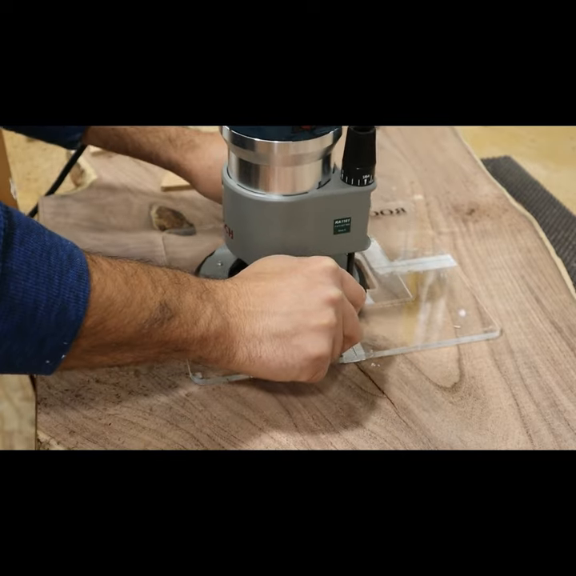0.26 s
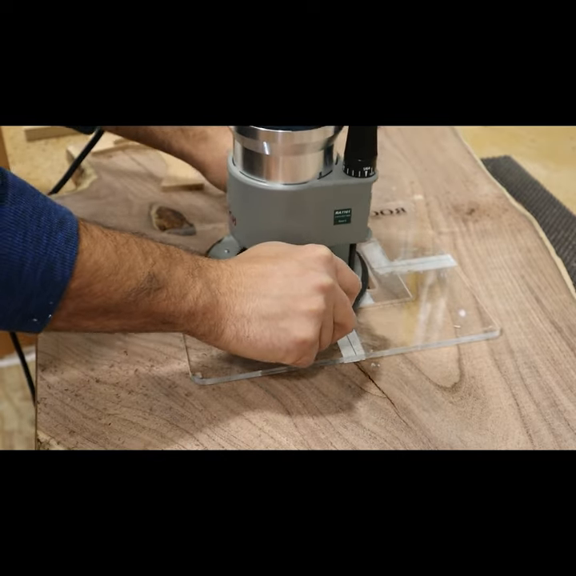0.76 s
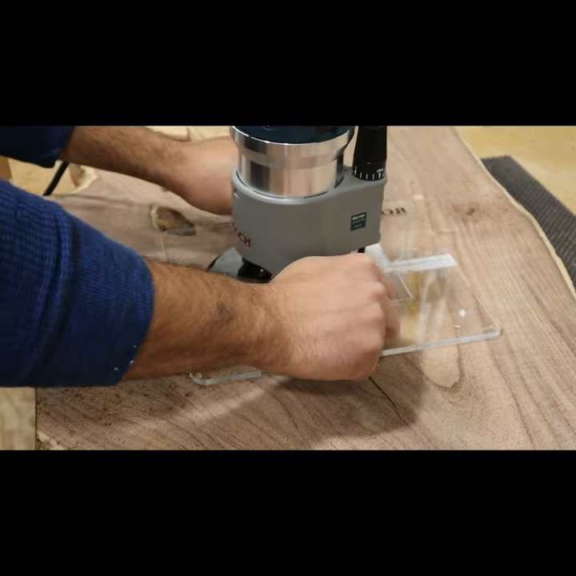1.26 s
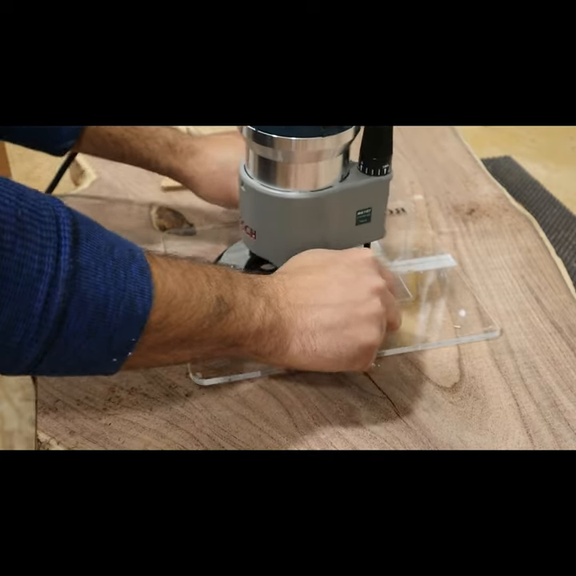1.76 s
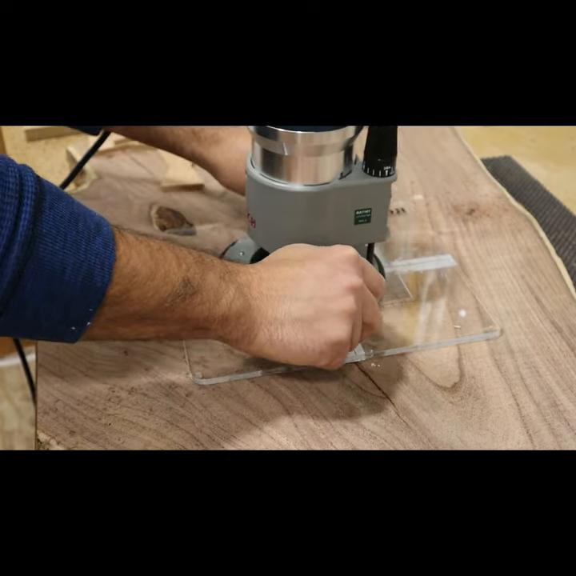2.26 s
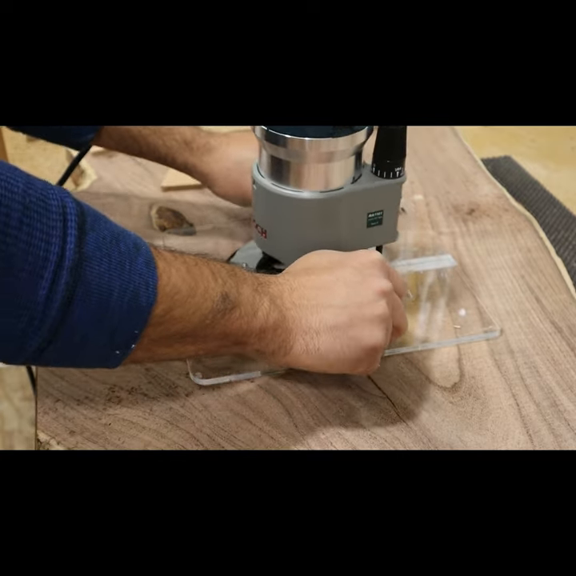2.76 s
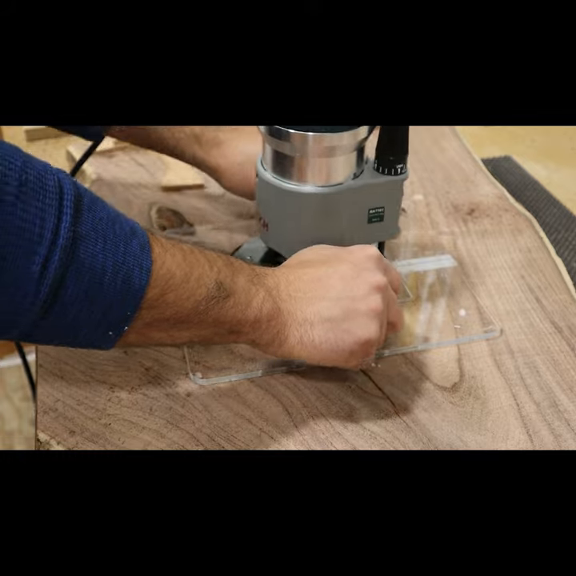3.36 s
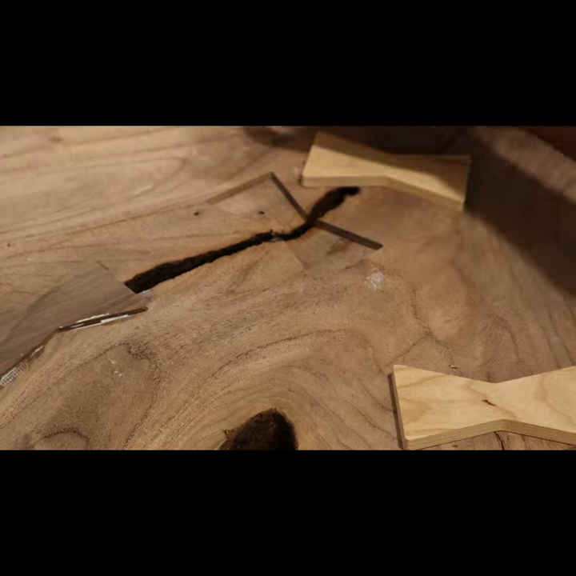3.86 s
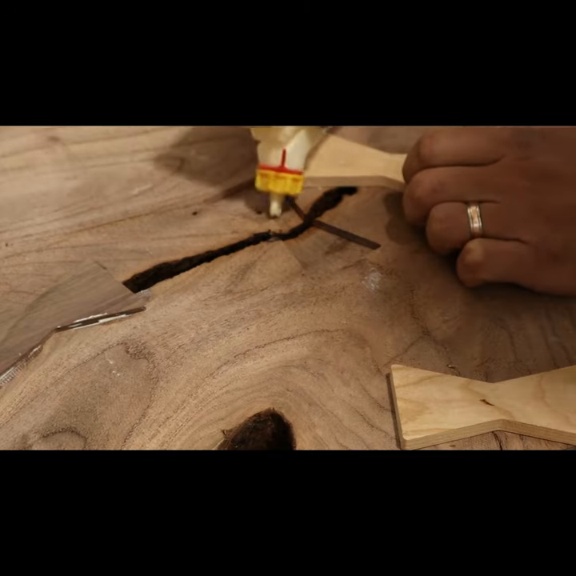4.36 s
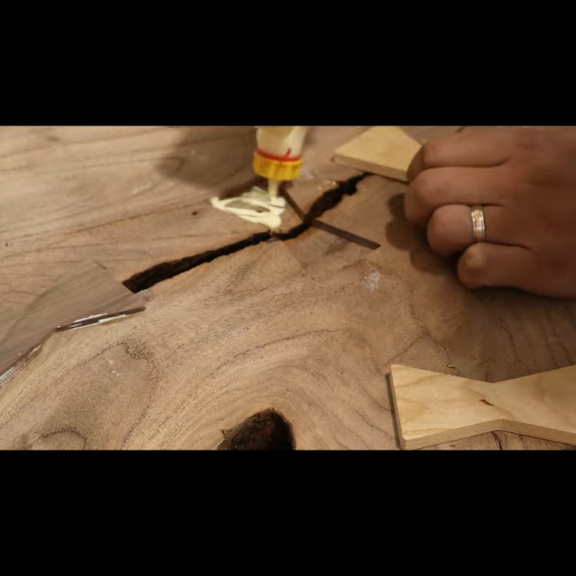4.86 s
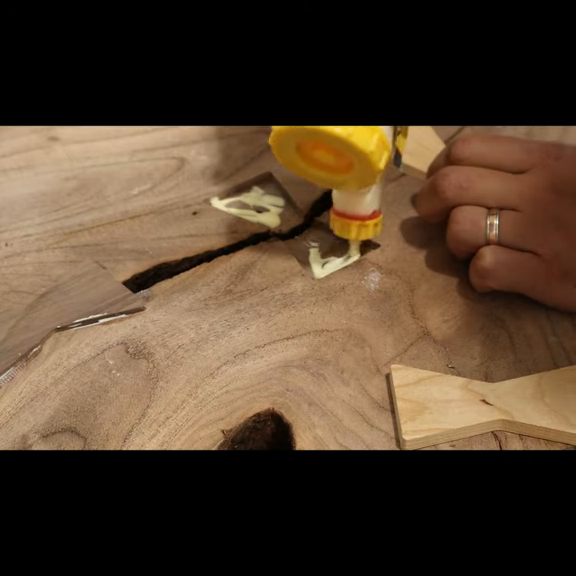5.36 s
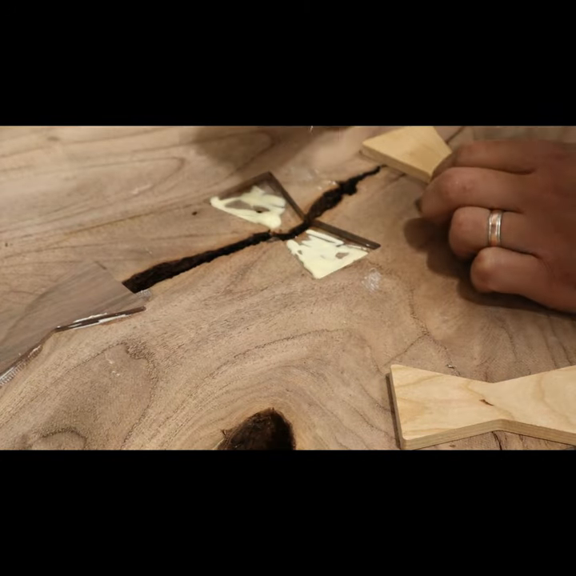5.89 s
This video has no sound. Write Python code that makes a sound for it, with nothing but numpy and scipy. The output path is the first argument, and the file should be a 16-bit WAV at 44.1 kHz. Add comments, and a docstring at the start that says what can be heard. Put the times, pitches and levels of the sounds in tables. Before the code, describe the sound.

Close up in a small workshop, an electric router cuts a wooden slab: a piercing, rough high squeal over fan rush, motor whine and gritty chip spray, with brief gaps between four passes. It ends abruptly before four seconds. In the quiet room, a cluster of dull wooden knocks follows at once, then soft brushing, sparse faint taps, two tiny bottle clicks and a last double knock.

```python
"""Router on a wooden slab

A handheld router makes four cutting passes: band-shaped noise is the fan's rush, noise bursts are flying
chips, and a modulated tone is the shrill squeal of the two-flute bit.
The router ends abruptly. Then, in the quiet workshop, thuds, taps and swells of hiss are wooden pieces set
down and slid on the slab, and short ringing tones are a glue bottle's clicks.
"""
import sys
import numpy as np
from scipy import signal
from scipy.fft import rfft, irfft, next_fast_len
from scipy.io import wavfile
from scipy.ndimage import uniform_filter1d, map_coordinates

SR = 44100
rng = np.random.default_rng(int(sys.argv[2]) if len(sys.argv) > 2 else 0)


def wrap_up_sound(samples):
    """Save the sound to the file named by the first command line argument, as 16-bit audio."""
    columns = np.atleast_2d(samples).T
    # keep every value between -1 and 1, then stretch to whole-number steps
    tamed = np.clip(columns, -1, 1)
    steps = np.round(tamed * 32767).astype(np.int16)
    wavfile.write(sys.argv[1], SR, steps)


N = 270333
TIME = np.arange(N) / SR
FRAME_HZ = 300  # slow changes of the tone lines are worked out this many times a second
FRAMES = np.arange(N * FRAME_HZ // SR + 2) / FRAME_HZ

# All levels in the tables are relative; the functions add the final balance.
# Motor speed, which sags under load. Each row: time in seconds, turns a second.
MOTOR_SPEED = [(0.03, 245.6), (0.22, 246.9), (0.41, 242.0), (0.53, 246.5), (0.66, 243.1), (0.98, 244.4),
               (1.34, 242.0), (1.55, 248.6), (1.74, 245.2), (1.97, 242.6), (2.06, 240.0), (2.29, 244.3),
               (2.5, 241.6), (2.66, 245.4), (2.86, 245.3), (3.12, 240.6), (3.2, 244.5), (3.58, 243.6),
               (3.69, 246.5)]
# The bit is in the wood. Each row: start in seconds, end in seconds.
CUTS = [(0.005, 1.394), (1.598, 2.598), (2.657, 3.155), (3.195, 3.608)]
ENTRY_S, EXIT_S, SETTLE_S = 0.034, 0.026, 0.14  # easing in, easing out, steadying of the cut
ROUTER_END_S = 3.698

# Pitch of the chatter note, which sags with the load and starts flat. Each row: time in seconds, Hz.
NOTE_PITCH = [(0.022, 5703.0), (0.052, 5641.0), (0.075, 5689.0), (0.205, 5715.0), (0.342, 5683.0),
              (0.402, 5619.0), (0.499, 5720.0), (0.756, 5663.0), (0.853, 5699.0), (1.252, 5676.0),
              (1.265, 5658.0), (1.634, 5680.0), (1.659, 5661.0), (1.706, 5701.0), (2.05, 5645.0),
              (2.12, 5681.0), (2.19, 5643.0), (2.265, 5690.0), (2.415, 5678.0), (2.454, 5639.0),
              (2.622, 5688.0), (2.664, 5640.0), (2.784, 5649.0), (2.796, 5699.0), (2.976, 5686.0),
              (3.023, 5650.0), (3.265, 5626.0), (3.36, 5692.0), (3.539, 5666.0), (3.599, 5698.0)]
# Strength of the chatter note, one curve a pass. Each row: time in seconds, level in dB.
NOTE_LEVEL = [
    [(0.007, -33.5), (0.052, -17.0), (0.107, -21.5), (0.122, -16.5), (0.254, -18.5), (0.359, -22.0),
     (0.369, -19.0), (0.414, -30.5), (0.509, -15.0), (0.599, -24.0), (0.631, -21.5), (0.683, -27.5),
     (0.731, -22.0), (0.746, -26.0), (0.791, -18.0), (0.863, -22.0), (0.963, -20.0), (0.985, -25.0),
     (1.08, -19.0), (1.225, -15.0), (1.247, -19.0), (1.384, -22.0)],
    [(1.606, -17.5), (1.626, -16.0), (1.674, -18.5), (1.694, -26.5), (1.719, -22.5), (1.776, -23.0),
     (1.806, -17.5), (1.871, -24.0), (1.911, -18.5), (1.966, -24.5), (2.018, -19.5), (2.05, -24.0),
     (2.063, -29.5), (2.118, -24.5), (2.198, -20.0), (2.217, -26.5), (2.275, -15.5), (2.31, -24.5),
     (2.36, -17.0), (2.499, -25.0), (2.512, -18.0), (2.529, -24.5), (2.572, -18.5), (2.589, -23.0)],
    [(2.666, -24.0), (2.679, -21.0), (2.761, -20.5), (2.791, -27.5), (2.804, -20.5), (2.886, -19.5),
     (2.913, -25.0), (2.936, -21.0), (3.011, -25.0), (3.13, -19.5), (3.148, -25.5)],
    [(3.2, -28.0), (3.213, -25.5), (3.223, -30.0), (3.26, -22.0), (3.32, -26.0), (3.337, -20.0),
     (3.355, -27.5), (3.37, -23.5), (3.432, -25.5), (3.445, -22.0), (3.529, -18.5), (3.599, -22.0)],
]
# Strong sideband two shaft turns below the note, one curve a pass. Each row: time in seconds, level in dB.
TWO_TURNS_BELOW = [
    [(0.007, -36.5), (0.04, -25.0), (0.082, -34.0), (0.437, -31.5), (0.554, -38.0), (0.589, -31.5),
     (0.748, -24.0), (0.766, -31.0), (1.028, -30.5), (1.043, -27.0), (1.285, -31.5), (1.324, -29.0),
     (1.384, -33.5)],
    [(1.606, -26.0), (1.671, -30.5), (1.686, -22.5), (1.828, -29.0), (1.983, -28.5), (2.018, -25.0),
     (2.06, -29.5), (2.212, -27.0), (2.227, -34.5), (2.315, -35.5), (2.365, -25.5), (2.392, -31.0),
     (2.494, -31.0), (2.589, -34.5)],
    [(2.666, -29.0), (2.739, -27.5), (2.829, -36.0), (2.946, -34.5), (2.963, -38.5), (2.996, -31.5),
     (3.098, -29.0), (3.148, -30.0)],
    [(3.2, -30.5), (3.22, -21.5), (3.258, -27.0), (3.28, -38.5), (3.3, -30.5), (3.345, -36.0),
     (3.512, -32.5), (3.599, -38.5)],
]
# Strong sideband four shaft turns below the note, one curve a pass. Each row: time in seconds, level in dB.
FOUR_TURNS_BELOW = [
    [(0.007, -34.5), (0.03, -28.0), (0.205, -36.5), (0.292, -32.0), (0.309, -37.5), (0.364, -27.0),
     (0.561, -37.5), (0.614, -27.0), (0.681, -38.0), (0.751, -25.5), (0.776, -33.5), (0.868, -29.0),
     (0.933, -33.0), (0.968, -25.5), (0.988, -29.5), (1.31, -31.5), (1.369, -27.0), (1.384, -32.5)],
    [(1.606, -26.5), (1.666, -35.5), (1.729, -25.5), (1.763, -31.5), (1.946, -25.0), (1.976, -27.5),
     (2.01, -18.0), (2.055, -30.0), (2.113, -26.5), (2.145, -38.0), (2.202, -30.0), (2.22, -34.0),
     (2.362, -25.5), (2.484, -32.0), (2.499, -25.0), (2.589, -36.0)],
    [(2.666, -31.5), (2.724, -25.0), (2.786, -35.0), (2.799, -29.0), (3.051, -27.0), (3.085, -31.5),
     (3.11, -26.0), (3.148, -29.0)],
    [(3.2, -32.0), (3.22, -27.5), (3.268, -34.0), (3.4, -27.5), (3.552, -27.5), (3.587, -23.5),
     (3.599, -28.0)],
]
# Other parts of the squeal, one curve a pass.
# Each row: time in seconds, octave level in dB, level in dB of the sideband two turns above the note.
OVERTONES = [
    [(0.007, -42.5, -36.0), (0.1, -33.5, -26.5), (0.342, -33.5, -29.5), (0.402, -41.0, -37.5),
     (0.504, -32.5, -33.5), (0.751, -36.5, -32.0), (0.783, -34.0, -28.0), (1.038, -29.0, -33.0),
     (1.063, -29.0, -37.0), (1.09, -30.5, -31.0), (1.384, -36.0, -32.0)],
    [(1.606, -37.0, -36.0), (1.666, -37.0, -28.5), (1.746, -32.5, -27.0), (1.976, -34.5, -29.0),
     (2.013, -32.5, -28.5), (2.115, -33.0, -33.0), (2.175, -40.0, -39.0), (2.292, -33.0, -31.5),
     (2.574, -37.0, -33.0), (2.589, -42.5, -37.5)],
    [(2.666, -40.5, -40.0), (2.689, -38.0, -40.5), (2.746, -34.5, -29.5), (2.886, -34.5, -24.0),
     (3.113, -32.5, -30.0), (3.13, -32.0, -34.0), (3.148, -38.5, -36.0)],
    [(3.2, -43.0, -45.5), (3.268, -37.5, -32.5), (3.29, -36.0, -36.0), (3.375, -31.0, -27.0),
     (3.44, -28.5, -23.5), (3.577, -31.0, -28.0), (3.599, -35.5, -34.5)],
]
# Sidebands fade away from the note. Each row: offset in shaft turns, level in dB.
SIDEBAND_SKIRT = [(-16, -23), (-8, -21), (-6, -15), (-4, 0), (2, 0), (4, -8), (6, -22), (16, -21)]
# Lines around the octave of the note. Each row: offset in shaft turns, dB against the octave level.
OCTAVE_LINES = [(-5, -42), (-5, -12.5), (0, 2), (5, -6.5), (0, -6), (1.5, -18), (7, -28)]
# The note swings between the ears as the router moves through its own reflections.
# Each row: time in seconds, left minus right in dB.
NOTE_SWAY = [(0.022, -2.5), (0.04, -6.0), (0.307, 3.5), (0.357, -3.0), (0.856, 0.0), (0.995, 7.5),
             (1.043, -6.0), (1.24, 1.0), (1.277, -5.5), (1.619, 0.0), (1.659, 5.0), (1.721, -1.5),
             (1.783, 6.0), (1.98, -4.5), (2.045, 10.5), (2.135, -2.0), (2.352, 5.0), (2.474, -6.0),
             (2.572, 0.0), (2.779, -11.0), (2.794, -1.0), (2.966, 6.5), (3.006, -8.0), (3.048, -0.5),
             (3.108, -3.5), (3.128, 1.5), (3.312, -1.0), (3.33, 6.0), (3.46, -8.0), (3.485, 3.0),
             (3.517, -6.0), (3.599, -1.0)]
NOTE_WANDER_HZ = 3
NOTE_SWING_DB, SIDEBAND_SWING_DB = .75, 2.2
ENTRY_LOOSE = .8  # extra looseness of the note as the bit enters
ENTRY_ODD_DB = 5  # boost of the weak lines one and three turns below the note as the bit enters

# Lines from the flutes striking the wood. Each row: multiple of the shaft speed, level in dB.
BITE_LINES = [(8, -53), (12, -52), (16, -45), (20, -42), (23, -45), (26, -48), (30, -55), (40, -54),
              (48, -58), (52, -62)]
# Colour of the chip spray. Each row: Hz, dB per Hz.
CHIP_COLOUR = [(300, -30), (1500, -13), (3000, -9), (4300, -2), (4900, 3), (5800, 3), (6900, -4),
               (9500, -4.5), (11000, -10), (12600, -12), (13300, -27), (15000, -45)]
# The bit's bending resonance under a rough bite. Each row: Hz, dB per Hz.
RASP_COLOUR = [(1500, -75), (3500, -61), (4500, 1), (5100, -6), (5750, 3), (6300, -17), (7500, -17),
               (12000, -74)]
# The bit grazes the wood or grabs at hard grain.
# Each row: peak time in seconds, half length in seconds, rasp level in dB.
GRABS = [(.05, .02, -38), (.38, .025, -35), (.62, .03, -37), (.745, .028, -34), (1.404, .012, -41),
         (1.575, .02, -39), (1.615, .02, -36), (1.7, .026, -34), (2.715, .045, -33), (3.222, .014, -28),
         (3.255, .02, -34), (3.59, .022, -39)]
SCRAPE_DB = -35.5  # the rasp that goes on all through a cut

# Level of the fan's rush. Each row: time in seconds, level in dB.
FAN_LEVEL = [(0.0, -26.0), (0.087, -32.0), (0.853, -32.5), (0.893, -31.0), (1.327, -34.0), (1.584, -29.5),
             (1.631, -32.0), (2.105, -35.0), (2.35, -33.0), (2.39, -35.5), (2.627, -35.0), (2.686, -32.5),
             (3.12, -34.5), (3.445, -32.0), (3.627, -36.0), (3.679, -33.0)]
# Colour of the fan's rush. Each row: Hz, dB per Hz.
FAN_COLOUR = [(35, -77), (60, -36.5), (312, -16.5), (464, -8.5), (642, -6.5), (1050, 7), (1350, 1.5),
              (1790, -11), (2010, -5.5), (3190, -10), (3420, -7), (4740, -8), (6120, -10), (13200, -20.5),
              (15500, -65.5)]
# Hum of the two flutes. Each row: time in seconds, level in dB.
FLUTE_HUM = [(0.0, -37.5), (0.18, -46.0), (0.461, -37.0), (0.509, -45.5), (0.818, -33.0), (1.053, -36.5),
             (1.367, -39.0), (1.404, -48.0), (1.734, -43.0), (1.811, -48.5), (1.993, -39.0), (2.083, -48.5),
             (2.165, -46.0), (2.222, -35.0), (2.517, -37.0), (2.627, -50.0), (2.671, -41.5), (2.731, -48.0),
             (3.071, -39.5), (3.18, -49.5), (3.218, -37.0), (3.452, -35.0), (3.579, -39.0), (3.637, -57.0),
             (3.679, -45.5)]
# The hum shifts between the ears as the router moves through standing waves.
# Each row: time in seconds, radians by which the left leads.
HUM_LEAD = [(.15, 1.8), (.45, 0), (1, 1.1), (1.1, -1.3), (1.35, -2.3), (1.7, -.5), (1.9, -2.6),
            (2.28, -1.4), (2.6, 2), (2.75, -1.4), (2.9, .8), (3, 2.5), (3.35, 2.7), (3.45, 1.6)]
# The motor's own lines. Each row: multiple of the shaft speed, level in dB.
WHINE_LINES = [(3, -62), (4, -52), (8, -54), (10, -61), (12, -55), (14, -53), (16, -55), (18, -58),
               (21, -64), (24, -56), (26, -60), (36, -62), (52, -69)]
FREE_WHINE_DB = 4.5  # the motor whines more when the bit runs free
# One line of the motor sings out briefly.
# Each row: peak time in seconds, half length in seconds, level in dB.
SINGS = [(1.32, .035, -38), (1.525, .055, -36.5)]
SING_ORDER = 14  # multiple of the shaft speed
# The motor's low hum. Each row: time in seconds, shaft imbalance level in dB, mains level in dB.
LOW_HUM = [(0.0, -65.5, -69), (0.32, -62, -66), (0.37, -77, -75), (1.1, -77, -71), (1.16, -60, -97),
           (1.85, -82, -62.5), (2.41, -59, -75.5), (2.98, -77.5, -69.5), (3.4, -55.5, -74),
           (3.66, -61, -74)]
PATCHY_DB = 1.9  # depth in dB of a random level change across the noise

# Wood set down on the slab. Each row: time in seconds, thud level in dB, thud pitch in Hz,
# tap level in dB, tap's low edge in Hz, tap's high edge in Hz, seconds for the tap to fade by 60 dB.
KNOCKS = [(3.713, -42, 83.6, -40.5, 765, 2400, 0.24), (3.797, -41, 81, -36.5, 370, 1120, 0.048),
          (3.815, -31.5, 83, -36, 330, 1000, 0.057), (3.825, -31.5, 80, -20, 674, 1560, 0.033),
          (3.841, -33, 135, -35, 250, 880, 0.073), (4.202, -61, 100.6, -47.5, 500, 1200, 0.057),
          (4.645, -48, 89, -65, 230, 695, 0.039), (4.816, -55, 100, -42.5, 810, 2540, 0.14),
          (5.02, -45, 90, -42.5, 646, 1600, 0.13), (5.035, -35, 90, -45, 1050, 1420, 0.095),
          (5.171, -49, 90, -40, 693, 1690, 0.042), (5.897, -54, 110, -67, 230, 700, .04),
          (5.933, -47, 153.4, -34, 303, 910, 0.047), (5.943, -39, 159, -26.5, 270, 815, 0.033),
          (6.087, -49, 131, -44, 700, 2480, 0.11), (6.106, -48, 100, -39, 300, 900, 0.051)]
# The slab's ring. Each row: pitch in Hz, width in Hz, level in dB.
SLAB_MODES = [(146, 100, -4), (284, 63, 8), (537, 100, 3), (810, 180, 1), (1125, 36, 0), (1265, 68, 1),
              (1600, 320, -3), (2120, 1000, -5.5), (5460, 220, 10.5)]
BLOW_DB = 20.5  # a contact's single push, over its scuffing
# Hands and pieces sliding over the wood.
# Each row: peak time in seconds, half length in seconds, level in dB.
SLIDES = [(3.723, .014, -38), (3.816, 0.057, -50.5), (3.918, 0.0072, -41), (4.012, 0.025, -47),
          (4.089, 0.049, -43.5), (4.241, 0.026, -61), (4.826, 0.0064, -63.5), (4.897, 0.024, -62),
          (5.17, 0.033, -62), (6.111, 0.04, -55.5)]
# Colour of the sliding hiss. Each row: Hz, dB per Hz.
HISS_COLOUR = [(470, -53), (800, -20), (1910, -5.5), (2080, -13), (3020, -1), (4770, 0.5), (9090, -5),
               (15500, -19.5)]
# Clicks of the glue bottle. Each row: start in seconds, level in dB.
BOTTLE_CLICKS = [(4.824, -56), (4.888, -61)]
# The bottle's ring. Each row: pitch in Hz, level in dB, seconds to fade by 60 dB.
BOTTLE_MODES = [(2470, -17, 0.27), (5300, 4, 0.092), (5518, 0, 0.078), (6298, -7, 0.033)]
# Colour of the quiet room. Each row: Hz, dB per Hz.
ROOM_COLOUR = [(15, -35), (25, -14), (60, -4), (152, -8), (322, -9.5), (469, -11), (582, -13.5), (648, -13),
               (848, -15.5), (945, -16.5), (2850, -22.5), (11800, -28), (15500, -34)]
TOP_HZ = 15700  # nothing is kept from here up


def router():
    """The motor runs until the abrupt end; the main chatter and chip sounds follow the passes."""
    speed = curves(MOTOR_SPEED)[0] + .3 * wobble(24)
    shaft = phase_of(speed)
    cutting = contact() * chatter(shaft) + chips(shaft)
    sound = motor(shaft) + workshop(cutting, t60=.3, wet_db=-15)
    return sound * np.clip((ROUTER_END_S - TIME) / 0.0013, 0, 1)


def chatter(shaft):
    """The bit rings at its bending note; each flute's bite modulates it: sidebands a shaft speed apart."""
    entry = unsettled()
    note_db = pass_curves(NOTE_LEVEL)[0]
    # a weak or newly started note is only loosely locked, so its level and pitch wander more
    loose = np.interp(note_db, [-29, -17], [2, .7]) + ENTRY_LOOSE * per_frame(entry)
    note_db = note_db + NOTE_SWING_DB * loose * per_frame(wobble(70))
    jitter_hz = np.interp(TIME, FRAMES, loose) * (5 * wobble(55) + 7 * wobble(400))
    bend = phase_of(curves(NOTE_PITCH)[0] + NOTE_WANDER_HZ * wobble(16) + jitter_hz)

    overtone_db, above_db = pass_curves(OVERTONES)
    below_4_db, below_2_db = pass_curves(FOUR_TURNS_BELOW)[0], pass_curves(TWO_TURNS_BELOW)[0]
    orders, skirt_db = ladder(SIDEBAND_SKIRT, odd_db=-9)
    strong = [-4, -2, 0, 2]
    # every sideband swells with its strong neighbours
    share = np.array([np.interp(orders, strong, row) for row in np.eye(4)]).T
    level_db = share @ [below_4_db, below_2_db, note_db, above_db] + skirt_db
    # on entry one flute bites harder than the other, which fills the gaps below the note
    gaps = np.isin(orders, [-3, -1])[:, None]
    level_db = level_db + ENTRY_ODD_DB * gaps * per_frame(np.sqrt(entry))
    # the weak lines come and go, and each line has its own place between the ears
    weak = ~np.isin(orders, strong)[:, None]
    note = (orders == 0)[:, None]
    level_db = level_db + weak * (5 * line_drift(orders, 9) - 1.5)
    level_db = level_db + ~note * (SIDEBAND_SWING_DB * line_drift(orders, 16) - 1.3)
    sway_db = note * curves(NOTE_SWAY, FRAMES) + np.where(note, 3, 7) * line_drift(orders, 9)
    flutter = np.where(note, .09, .27) * loose
    squeal = comb(shaft, orders, level_db + sides(sway_db), flutter, rate=38, carrier=bend)

    orders, octave_db = ladder(OCTAVE_LINES, odd_db=-13)
    octave_db = octave_db + overtone_db + 4 * line_drift(orders, 6)
    octave = comb(shaft, orders, octave_db, scatter=.6, rate=18, carrier=2 * bend)
    return amp(1.5) * squeal + amp(-6.0) * octave


def chips(shaft):
    """Flutes tear off chips: shaft-locked knocks, noise twice a turn, and a rasp through each cut that
    swells on grabs."""
    orders, bite_db = ladder(BITE_LINES, odd_db=-7)
    strikes = comb(shaft, orders, bite_db + 6 * line_drift(orders, 5), scatter=1.5, rate=30)
    unevenness_db = 2.62 * wobble(24.96) + 3.5 * wobble(300)
    burst = np.exp(0.65 * np.cos(2 * shaft)) * amp(unevenness_db)
    spray = amp(-36.0) * unit(burst * patchy(noise(CHIP_COLOUR), PATCHY_DB))
    rasp_level = amp(SCRAPE_DB) * contact() + swells(GRABS)
    rasp = rasp_level * unit(burst * noise(RASP_COLOUR))
    return contact() * (amp(-1.5) * strikes + spray) + rasp


def motor(shaft):
    """Fan noise, the hum of two flutes passing each turn, shaft whine, imbalance and a trace of mains hum."""
    fan_db, flute_db = curves(FAN_LEVEL)[0], curves(FLUTE_HUM)[0]
    imbalance_db, mains_db = curves(LOW_HUM)
    rush = amp(fan_db + 2.0 + 1.4 * wobble(17)) * patchy(noise(FAN_COLOUR), PATCHY_DB)

    lead = curves(HUM_LEAD) * np.array([[.5], [-.5]])
    unsteady = .45 * np.array([wobble(24.15), wobble(25.14)])
    flutes = amp(flute_db + 2.5 + 2.5 * wobble(22.04)) * np.sin(2 * shaft + lead + unsteady)

    sing = swells(SINGS) * comb(shaft, np.array([SING_ORDER]), 0, scatter=1, rate=40)
    whine_lines = comb(shaft, *ladder(WHINE_LINES, odd_db=-5), scatter=1, rate=14)
    whine = amp(FREE_WHINE_DB * (1 - contact())) * whine_lines

    imbalance_phase = shaft + np.array([[.7], [-.7]]) + 0.37 * wobble(5.18)
    imbalance = amp(imbalance_db + 4) * np.sin(imbalance_phase)
    mains = amp(mains_db + 2.0 + 2.9 * wobble(15)) * np.sin(2 * np.pi * 100 * TIME)
    return rush + flutes + whine + sing + imbalance + mains


def contact():
    """1 while the bit is in the wood, easing in and out at each end."""
    total = np.zeros(N)
    for start, end in CUTS:
        edge = np.minimum((TIME - start) / ENTRY_S, (end - TIME) / EXIT_S)
        total += np.sin(np.pi / 2 * np.clip(edge + .5, 0, 1)) ** 2
    return total


def unsettled():
    """Jumps up as the bit enters the wood and dies away as the cut steadies."""
    total = np.zeros(N)
    for start, _ in CUTS:
        fade = np.exp(-np.maximum(TIME - start, 0) / SETTLE_S)
        total += fade * (TIME > start - ENTRY_S / 2)
    return total


def slab_response(f):
    """The slab's resonances, with neighbours in opposite sign."""
    total = 0
    for k, (centre, width, db) in enumerate(SLAB_MODES):
        damping = 1j * f * width
        total = total + (-1) ** k * amp(db) * damping / (centre * centre - f * f + damping)
    return total


def knocks():
    """Each contact bounces the slab on its bench and rings its modes; soft contacts are dull."""
    out = np.zeros((2, N))
    thud_t60, thud_rise = .075, .014  # seconds
    blows = np.bincount([round((s + 0.002984) * SR) for s, *_ in KNOCKS], minlength=N)
    grain = filtered(amp(BLOW_DB) * blows + rng.standard_normal((2, N)), slab_response)
    t = np.arange(SR // 4) / SR
    for s, thud_db, thud_hz, tap_db, low_hz, high_hz, t60 in KNOCKS:
        start = round(s * SR)
        edges = np.clip([low_hz, high_hz], 50, SR / 3)
        band = signal.butter(2, edges, "band", fs=SR, output="sos")
        tap = unit(signal.sosfilt(band, np.roll(grain, -start, axis=1)[:, :len(t)]))
        tap = amp(tap_db + 3.5 - 60 * t / t60) * (1 - np.exp(-t / 0.0052)) * tap
        # the wide slab reaches the two ears slightly out of step
        bounce = np.sin(2 * np.pi * thud_hz * t + np.array([[0], [.8]]))
        thud = amp(thud_db + 18.5 - 60 * t / thud_t60) * (1 - np.exp(-t / thud_rise)) * bounce
        out[:, start:start + len(t)] += (tap + thud)[:, :N - start]
    return out


def slides():
    """Skin and wood brush the sanded slab: swells of grainy hiss."""
    return swells(SLIDES) * amp(2.5 + 1.7 * wobble(200)) * noise(HISS_COLOUR)


def bottle():
    """The glue bottle gives small clicks, each a sum of fading sine tones."""
    out = np.zeros((2, N))
    t = np.arange(SR // 4) / SR
    for s, db in BOTTLE_CLICKS:
        ring = 0
        for hz, level, t60 in BOTTLE_MODES:
            tone = np.sin(2 * np.pi * (hz * t + rng.random((2, 1))))
            ring = ring + amp(db + level - 60 * t / t60) * tone
        out[:, round(s * SR):][:, :len(t)] += ring * (1 - np.exp(-t / .003))
    return out


def workshop(x, t60, wet_db):
    """A short diffuse answer from the walls: the sound is smeared by fading noise."""
    t = np.arange(SR // 2) / SR
    tail = rng.standard_normal((2, len(t))) * amp(-60 * t / t60) * (t > .004)
    echo = signal.fftconvolve(x, tail / np.linalg.norm(tail[0]), axes=1)[:, :N]
    return x + amp(wet_db) * echo


def room_tone():
    """Faint coloured noise of the quiet room, present once the router has ended."""
    return amp(-55.0) * noise(ROOM_COLOUR) * (TIME > ROUTER_END_S)


def amp(db):
    """Decibels to gain."""
    return 10 ** (np.asarray(db) / 20)


def unit(x):
    """Scaled to an rms (average strength) of 1."""
    return x / np.sqrt(np.mean(np.abs(x) ** 2) + 1e-20)


def curves(rows, at=TIME):
    """The value of each column at the given times."""
    s, *cols = np.transpose(rows)
    return np.array([np.interp(at, s, c) for c in cols])


def pass_curves(passes):
    """The curves of all passes joined, one value a frame."""
    return curves(np.concatenate(passes), FRAMES)


def per_frame(x):
    """A full-rate curve read at the frame times."""
    return np.interp(FRAMES, TIME, x)


def wobble(rate):
    """A smooth random curve, rate knots a second."""
    return map_coordinates(rng.standard_normal(int(N * rate / SR) + 4), [TIME * rate], order=2)


def filtered(x, response):
    """x with each frequency multiplied by the response there."""
    m = next_fast_len(N + SR // 4)
    return irfft(rfft(x, m) * response(np.fft.rfftfreq(m, 1 / SR)), m)[..., :N]


def noise(spectrum):
    """Coloured noise of rms 1, unrelated in the two channels."""
    f, db = np.transpose(spectrum)
    colour = lambda hz: amp(np.interp(np.log(hz + 1), np.log(f), db))
    return unit(filtered(rng.standard_normal((2, N)), colour))


def patchy(x, depth_db):
    """Noise whose level is varied at random over frequency and time."""
    z = signal.stft(x, nperseg=1024)[2]
    field = uniform_filter1d(rng.standard_normal(z.shape[1:]), size=4, axis=0)
    field = uniform_filter1d(field, size=5, axis=1)
    return unit(signal.istft(z * amp(depth_db * unit(field)), nperseg=1024)[1][:, :N])


def phase_of(hz):
    """Running phase, in radians, of a frequency curve."""
    return 2 * np.pi * np.cumsum(hz) / SR


def swells(rows):
    """Smooth bumps added up, each with its own peak time, half length and level."""
    return sum(amp(db) * np.exp(-((TIME - s) / half) ** 2) for s, half, db in rows)


def drift(count, rate):
    """Smooth complex random curves of rms 1: channels x lines x frames."""
    z = rng.standard_normal((2, count, len(FRAMES), 2)) @ [1, 1j]
    hz = np.fft.fftfreq(len(FRAMES), 1 / FRAME_HZ)
    return unit(np.fft.ifft(np.fft.fft(z) * np.exp(-(hz / rate) ** 2)))


def line_drift(orders, rate):
    """One smooth random curve a line, shared by both channels."""
    return drift(len(orders), rate)[0].real


def ladder(points, odd_db):
    """Every whole multiple with its dB; two nearly equal flutes leave the odd ones weak."""
    k, db = np.transpose(points)
    orders = np.arange(round(k[0]), round(k[-1]) + 1)
    return orders, np.interp(orders, k, db)[:, None] + odd_db * (orders[:, None] % 2)


def comb(shaft, orders, db, scatter, rate, carrier=0, size=768):
    """Lines a shaft speed apart around a carrier, fluttering in level and slowly turning in phase."""
    gains = amp(db) * (1 + scatter * drift(len(orders), rate)) / np.hypot(1, scatter)
    slow = drift(len(orders), 5.07)
    # a sideways source reaches the two ears out of step
    apart = np.array([.72, -.72])[:, None, None] + .6 * slow.imag
    gains = gains * np.exp(1j * (1.18 * slow[0].real + apart))
    turn = np.zeros((2, len(FRAMES), size), np.complex64)
    turn[:, :, orders] = gains.transpose(0, 2, 1)
    # the shape of one turn at each moment, read round and round at the shaft's angle
    shapes = np.fft.ifft(turn) * size
    where = [TIME * FRAME_HZ, shaft / (2 * np.pi) % 1 * size]
    wave = np.array([map_coordinates(w, where, order=1, mode="grid-wrap") for w in shapes])
    return np.sqrt(2) * (wave * np.exp(1j * carrier)).real


def sides(lean_db):
    """Left and right dB for a level difference, at constant power."""
    return -10 * np.log10((1 + amp(2 * np.array([-lean_db, lean_db]))) / 2)


def scene():
    """The router a little to the right, then the handling noises over the room tone."""
    handling = workshop(knocks() + slides() + bottle(), t60=0.32, wet_db=-10.0)
    return router() * amp([[-.6], [.6]]) + handling + room_tone()


def record(dry):
    """Cuts off everything from the band limit up."""
    return filtered(dry, lambda hz: hz < TOP_HZ)


dry = scene()
out = record(dry)
wrap_up_sound(out)
```